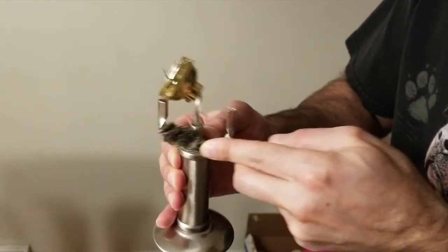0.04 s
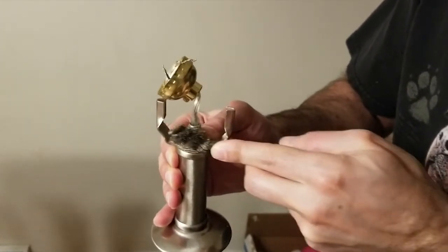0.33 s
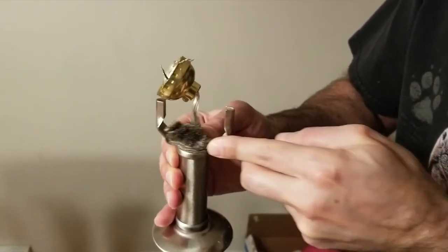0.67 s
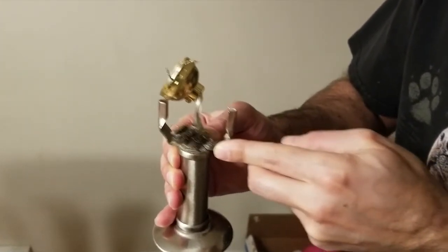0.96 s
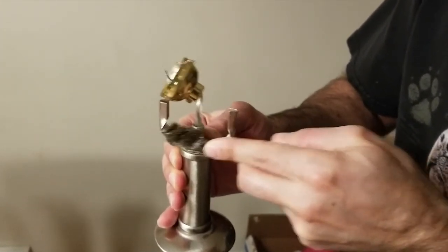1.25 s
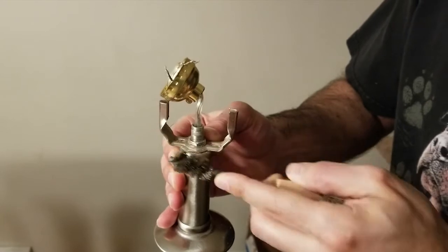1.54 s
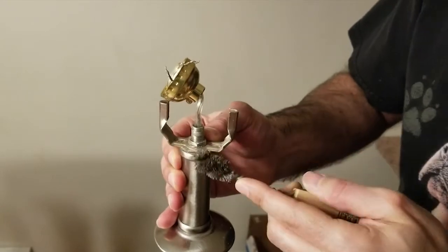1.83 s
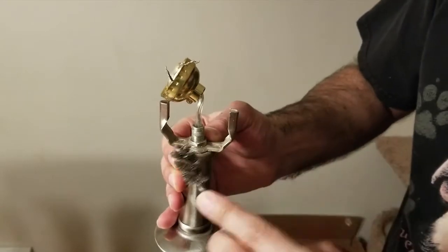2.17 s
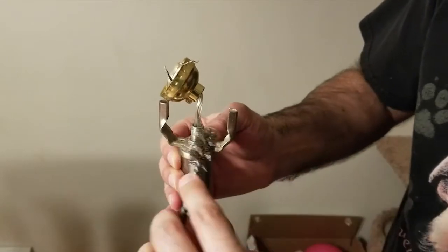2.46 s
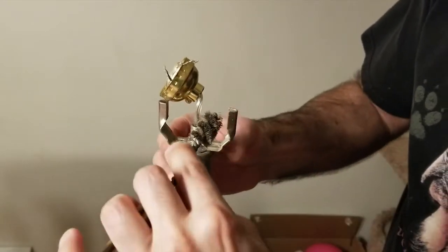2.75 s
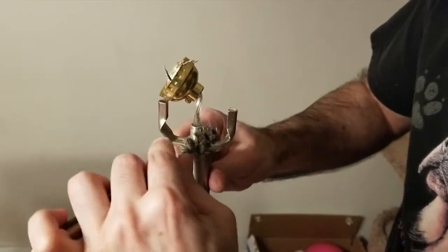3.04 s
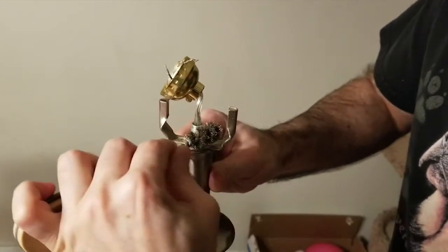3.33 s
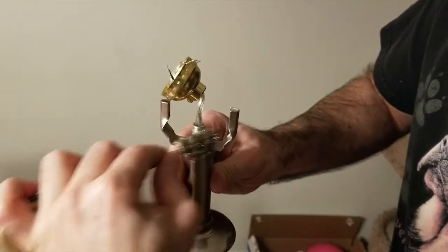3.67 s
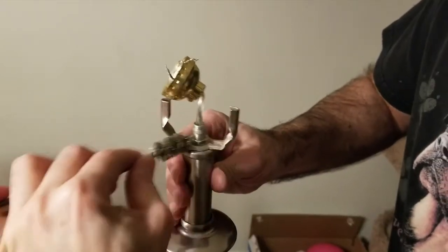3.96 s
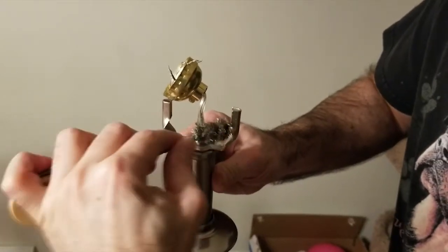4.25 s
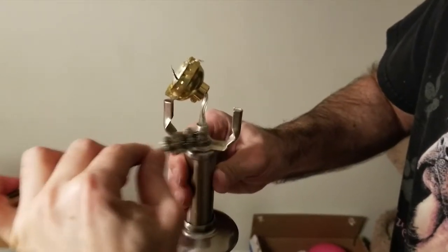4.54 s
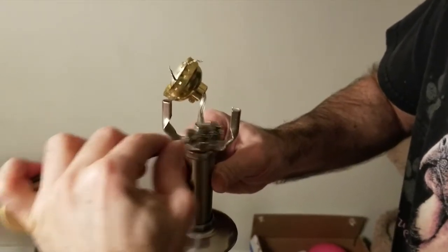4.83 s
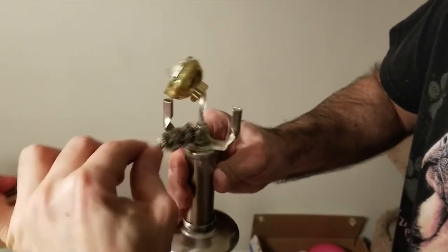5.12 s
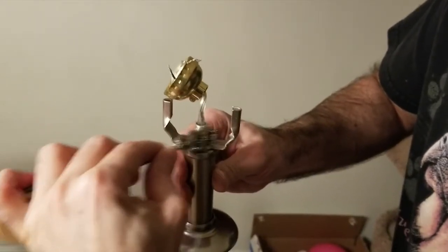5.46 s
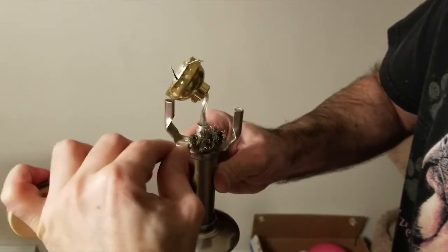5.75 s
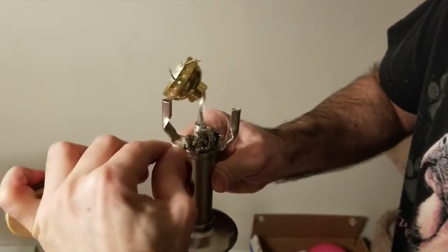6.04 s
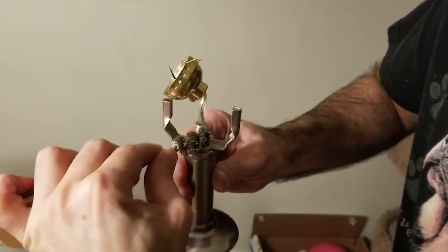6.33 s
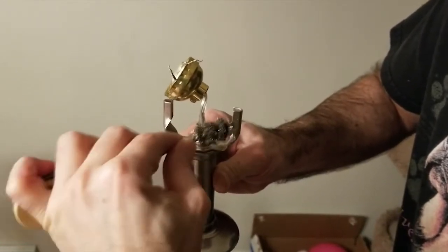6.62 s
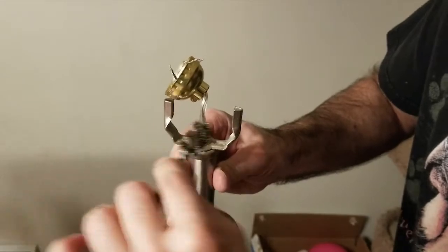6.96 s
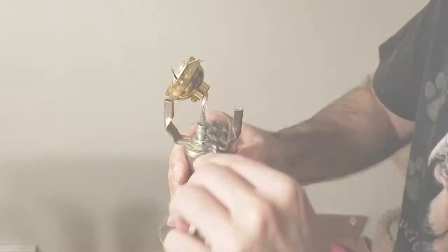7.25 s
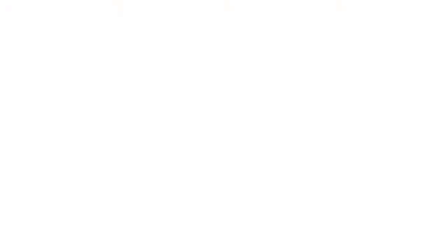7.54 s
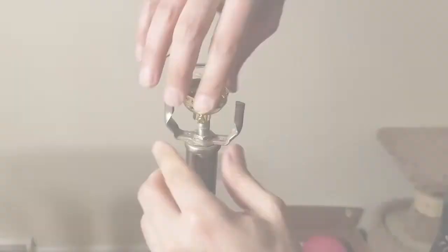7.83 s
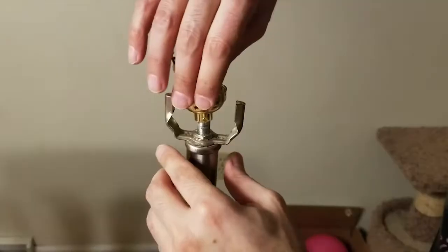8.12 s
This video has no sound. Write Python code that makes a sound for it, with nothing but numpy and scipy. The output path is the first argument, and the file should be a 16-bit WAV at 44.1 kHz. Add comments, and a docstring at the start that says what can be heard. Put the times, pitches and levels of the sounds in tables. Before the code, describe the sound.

Close to the microphone in a small room, a wire brush scrubs a metal lamp pipe in quick, scratchy strokes. It glides lightly with a faint hiss, then returns with longer, regular strokes, its shank sometimes knocking the pipe and making it ring. The scrubbing fades, and a brass cap is set on with soft clicks. Low handling bumps lie underneath.

```python
"""A small room, one microphone close to a hand-held lamp whose metal pipe is scrubbed with a wire brush.
Quick short strokes, a light pass down the side, then long strokes from the other side, where the shank
now and then knocks the pipe. Slipping wires shake themselves, the shank and the pipe; some catch and
spring off, and the pipe rings on. At the end a brass cap is set on with a few soft touches.
Underneath are low bumps of the holding hand, two dull rustles and a faint rumble."""
import sys
import numpy as np
from scipy import signal
from scipy.fft import rfft, irfft
from scipy.io import wavfile

SR = 44100
rng = np.random.default_rng(int(sys.argv[2]) if len(sys.argv) > 2 else 0)


def store_pcm(level_fs):
    """Save levels as 16-bit WAV."""
    pcm = np.round(np.clip(level_fs, -1, 1) * 32767).astype(np.int16)
    wavfile.write(sys.argv[1], SR, np.atleast_2d(pcm).T)


N = 369999
TIME = np.arange(N) / SR
TURNED = np.clip(TIME - 2, 0, 1)  # 0 in the tight first grip, 1 once the brush comes from the other side

# The brush on the pipe. Each row: start in seconds, end in seconds, strength in dB.
STROKES = [(0.029, 0.102, -28.5), (0.176, 0.27, -32.5), (0.306, 0.343, -38), (0.367, .41, -30.5),
           (0.491, 0.561, -31.5), (0.621, 0.654, -38), (0.688, 0.712, -29), (0.738, 0.809, -40.5),
           (0.804, 0.828, -27), (0.919, 0.946, -34), (1.037, 1.074, -39), (1.16, 1.214, -41.5),
           (1.23, 1.272, -26), (1.38, 1.411, -45.5), (3.193, 3.209, -41.5), (3.275, 3.324, -38.5),
           (3.428, 3.473, -27), (3.692, 3.732, -27), (3.886, 3.946, -25), (4.106, 4.139, -28),
           (4.268, 4.341, -27), (4.478, 4.529, -28.5), (4.669, 4.735, -28), (4.851, 4.914, -26),
           (5.041, 5.125, -28.5), (5.25, 5.322, -29.5), (5.44, 5.502, -29.5), (5.62, 5.656, -32),
           (5.682, 5.759, -40), (5.819, 5.877, -31.5), (5.914, 5.98, -33), (6.001, 6.019, -31.5),
           (6.166, 6.176, -39), (6.286, 6.363, -33), (6.492, 6.547, -27), (6.694, 6.763, -28),
           (7.232, 7.301, -47), (7.337, 7.396, -36.5), (7.434, 7.467, -34.5), (7.53, 7.565, -35.5)]
LIGHT_CONTACT = [(0, .82, -42.5), (.82, 1.45, -48), (1.45, 1.62, -65.5), (3.1, 3.4, -59), (5.33, 6.09, -44),
                 (6.77, 7.15, -64.5), (7.23, 7.58, -52)]  # the wires stay lightly on the metal
# The tips gliding down the pipe. Each row: time in seconds, level in dB.
GLIDE_LEVELS = [(2.1, -69), (2.25, -60), (2.44, -54), (2.65, -57), (2.86, -53), (2.93, -61.5), (3.15, -65)]
# Single events. Each row: start in seconds, strength in dB.
WIRE_SNAPS = [(.085, -13.5), (.177, -14.5), (.396, -18), (1.046, -20), (1.113, -30.5), (1.168, -25),
              (1.229, -19), (1.298, -25), (1.387, -25), (1.415, -29), (2.781, -41), (3.164, -38),
              (3.195, -28), (3.207, -25.5), (3.274, -26), (3.308, -21), (3.422, -23), (4.133, -18),
              (4.294, -17), (5.031, -24), (5.097, -10.5), (5.397, -26), (5.446, -18), (5.815, -26),
              (6.144, -27), (6.224, -33), (6.267, -27.5), (7.226, -37)]  # the loudest wires that catch and spring free
SHANK_KNOCKS = [(3.8614, -7.5), (4.079, -35.5), (4.243, -13), (4.448, -36), (4.6185, -7.5), (4.826, -35),
                (5.011, -32.5), (5.224, -43), (6.475, -40), (6.649, -8.5)]  # the shank lands ahead of a long stroke
SHANK_TWANGS = [(.074, -22), (.203, -25), (.251, -23.5), (.425, -29.5), (1.279, -25), (1.414, -26),
                (3.166, -35.5), (3.208, -29.5)]  # the twisted shank flexes
CAP_TOUCHES = [(7.847, -57), (8.084, -64), (8.118, -51), (8.128, -40)]
HAND_BUMPS = [(.058, -26), (0.258, -29), (.53, -24), (.825, -24.5), (1.251, -32), (1.625, -46),
              (2.659, -44), (2.858, -40.5), (4.28, -24.5)]
RUSTLES = [(0.0, -31), (7.576, -35.5)]

# The broad colour of each sound at the microphone. Each row: frequency in Hz, relative level in dB.
WIRE_SLOPE = [(1500, -20.5), (2800, -8.5), (4400, -6.5), (6000, -5.5), (7500, -5), (11500, 2), (13000, -13)]
SHANK_SLOPE = [(900, -38.5), (1700, -14.5), (2050, 0), (2600, -6), (3300, -25.5), (6000, -39)]
PIPE_SLOPE = [(50, -2), (130, 4.5), (300, 4.5), (500, 1), (620, -6), (850, -4), (1400, 2), (1700, -14.5),
              (3000, -32.5), (8000, -59.5)]
CRACK_SLOPE = [(500, -20), (1700, -25), (2000, 2.5), (2800, -8), (4400, -11), (6200, 2), (8300, 7.5),
               (9000, 0), (10300, 8), (13000, -15)]
GLIDE_SLOPE = [(120, -18), (200, -7), (418, -15), (723, -9), (1730, -16.5), (3380, -20.5), (6370, -7.5),
               (11200, -6.5), (12000, -19.5), (15600, -44), (22000, -120)]
CAP_SLOPE = [(150, -16), (600, -11), (1200, 4), (2200, -7.5), (3500, -2), (5000, -13), (8000, -4),
             (12000, -7)]
HAND_SLOPE = [(10, -9.0), (30, -5.5), (65, -1.5), (110, -6.5), (180, -14), (400, -41), (1500, -72)]
RUSTLE_SLOPE = [(100, -4.5), (400, 1), (540, 7.5), (1000, -0.5), (1800, -4), (2600, -18), (4200, -13.5),
                (5000, -21.5), (12000, -39)]
ROOM_TONE_SLOPE = [(15, -9.5), (35, -3), (62, 1.5), (120, -8), (220, -21), (450, -26.5), (1500, -40),
                   (5000, -42.5), (12000, -39.5)]
# Resonances of brush and lamp. Each row: centre in Hz, width in Hz, height above the slope in dB.
WIRE_PEAKS_FIRST = [(3800, 1400, 7.4), (7060, 530, 15.7), (8460, 330, 18.2), (10030, 520, 9.3)]
WIRE_PEAKS_TURNED = [(4255, 1100, -14.5), (5150, 130, 2.5), (7160, 270, 13.5), (8210, 240, 13.5),
                     (10190, 560, 9.5)]
SHANK_PEAKS = [(2295, 90, 12), (2417, 66, 11.1)]
PIPE_PEAKS_TIGHT = [(312.3, 34, 6.5), (452, 30, 8.5), (743.5, 28, 15.5), (1160, 28, 8.5), (1259, 47, 7),
                    (1382, 13, 16)]
PIPE_PEAKS_LOOSE = [(238, 13, 5), (300, 42, 5.8), (450.5, 21, 7.4), (738, 28, 20.7), (970, 12, 10),
                    (1185, 130, 9.9), (1268.8, 17, 18.3), (1379, 10, 14.3)]
CRACK_PEAKS = [(3640, 60, 3.2), (6440, 190, 7)]
THUD_PEAKS = [(231.3, 50, 7.9), (465, 43, 19.3), (583, 150, 13)]
HAND_PEAKS = [(64.5, 5.8, 4.9), (184.3, 4.3, 8)]
# The pipe ringing. Each row: frequency in Hz, relative level in dB, seconds to fall by 60 dB.
PIPE_MODES = [(660, -24.5, 0.99), (766, -19, 0.15), (991, -16.5, 0.082), (1163, -22, 0.73)]
CAPPED_MODES = [(730, -7.5, 0.31), (1162, -22, 0.73), (1290, -0.5, 0.14), (3400, -14, 0.16)]
# How freely the grip lets the pipe ring. Each row: time in seconds, gain in dB.
RING_FREEDOM = [(0, -12), (3.1, -9.5), (3.8, 4), (6.9, 4), (7.3, -8), (8.39, -8)]

GRAZE_S, GRAZE_DB = .025, -15.5  # the tips trail on after a stroke: this long, this much softer
REBOUND_S, REBOUND_DB = 0.0091, -10.5  # the shank bounces once
ROCK_DB, TREMBLE_DB, JOLT_DB = -7, -2, -13.5  # hand motion, relative to push, light contact and thud


def brushing(push):
    """Slipping wires shake three things: themselves, the shank and the pipe."""
    strokes = pressure(STROKES)
    graze = from_db(GRAZE_DB) * pressure(STROKES, overhang_s=GRAZE_S)
    touch = np.hypot(pressure(LIGHT_CONTACT), graze)
    tufts = unit_rms(flutter(per_s=190, depth_db=4))  # wires let go in clumps
    light_slips = touch * slips(per_s=1000, spread_db=5)
    snaps = bursts(*np.transpose(WIRE_SNAPS), decay_s=0.0023)
    snaps += wire_catches(touch + from_db(-2.5) * strokes)
    wires = wire_hiss(strokes, tufts, from_db(-9) * light_slips + snaps)
    return wires + shank_rasp(tufts) + pipe_rub(push * tufts, light_slips + snaps)


def wire_hiss(strokes, tufts, crackle):
    """The tips stick and slip; the wires bend and resonate differently from the other side."""
    tips = from_db(-0.55) * strokes * tufts * slips(per_s=8900, spread_db=6.5) + crackle
    tips += wire_pings(from_db(-7) * strokes * slips(per_s=1500, spread_db=3))
    tips = wire_reflection(tips)
    first_side = body(tips * (1 - TURNED), WIRE_SLOPE, WIRE_PEAKS_FIRST)
    other_side = body(tips * TURNED, WIRE_SLOPE, WIRE_PEAKS_TURNED)
    return from_db(0.52) * (first_side + other_side)


def wire_catches(rubbing, per_s=30, above_db=5, spread_db=2.5):
    """Single wires catch at random wherever the brush rubs, the louder the harder it presses."""
    at = np.flatnonzero((rng.random(N) < per_s / SR) & (rubbing > 0))
    levels_db = 20 * np.log10(rubbing[at]) + above_db + spread_db * rng.standard_normal(N)[at]
    return bursts(at / SR, levels_db, decay_s=0.0045)


def wire_pings(kicks, low_hz=2776, high_hz=12024, t60=0.02, count=24):
    """Each kick sets one of many wires swinging free, briefly, at a pitch of its own."""
    wire = rng.integers(0, count, N)
    pitches = np.geomspace(low_hz, high_hz, count) * np.exp(.02 * rng.standard_normal(count))
    ringing = sum(struck(kicks * (wire == k), hz, t60) for k, hz in enumerate(pitches))
    return np.std(kicks) * unit_rms(ringing)


def wire_reflection(x, delay_s=0.0008016, depth=0.45):
    """An echo along the wires; its delay wanders with the point of contact, so the colour shifts."""
    echo = np.interp(TIME - delay_s * flutter(per_s=10, depth_db=2), TIME, x)
    return (x + depth * echo) / np.sqrt(1 + depth ** 2)


def shank_rasp(tufts):
    """The twisted shank buzzes under the strokes, a little less once turned, and twangs as it flexes."""
    drive = stroke_drive(firm_db=-35.6, follows=0.92) * from_db(-2.5 * TURNED)
    rasp = drive * tufts * slips(per_s=1200, spread_db=2)
    twangs = from_db(1.9) * bursts(*np.transpose(SHANK_TWANGS), decay_s=0.0025)
    return body(rasp + twangs, SHANK_SLOPE, SHANK_PEAKS)


def pipe_rub(push, crackle):
    """Rubbing sounds the pipe's resonances; the tight first grip shifts and damps them."""
    rubbing = push * slips(per_s=4000, spread_db=3) + from_db(-11.5) * crackle
    tight = body(rubbing * (1 - TURNED), PIPE_SLOPE, PIPE_PEAKS_TIGHT)
    loose = body(rubbing * TURNED, PIPE_SLOPE, PIPE_PEAKS_LOOSE)
    return from_db(-1.83) * tight + from_db(-1.33) * loose


def shank_knocks():
    """The shank lands with a bright crack, a rebound and a thud in the pipe."""
    times, db = np.transpose(SHANK_KNOCKS)
    landings = bursts(times, db, decay_s=0.0038)
    rebounds = bursts(times + REBOUND_S, db + REBOUND_DB, decay_s=0.0068)
    thud = body(bursts(times, thud_level(db), decay_s=0.014), PIPE_SLOPE, PIPE_PEAKS_LOOSE + THUD_PEAKS)
    crack = body(landings + rebounds, CRACK_SLOPE, CRACK_PEAKS)
    return crack + from_db(-0.5) * thud


def pipe_ring(push):
    """Bending modes store the energy of knocks and rubbing and sing on, as far as the grip allows."""
    fed = (from_db(17.5) * push) ** 2 / SR
    for start, db in SHANK_KNOCKS:
        fed[int(start * SR)] += from_db(thud_level(db)) ** 2
    fed *= gain_curve(RING_FREEDOM) ** 2
    ring = np.zeros(N)
    for hz, db, t60 in PIPE_MODES:
        energy = signal.fftconvolve(fed, from_db(-60 * TIME[:SR] / t60) ** 2)[:N]
        swing = from_db(db) * np.sqrt(np.abs(energy)) * flutter(per_s=14, depth_db=0.9)
        ring += swing * np.sin(2 * np.pi * hz * TIME)
    return ring


def brush_glide():
    """Barely bent wires pass down the pipe with a fine, even hiss."""
    return gain_curve(GLIDE_LEVELS) * body(slips(per_s=9900, spread_db=3.5), GLIDE_SLOPE)


def brass_cap():
    """The cap meets the pipe with soft scrapes, a brief ring and two tiny ticks."""
    times, db = np.transpose(CAP_TOUCHES)
    scrapes = body(bursts(times, db, decay_s=0.012), CAP_SLOPE)
    kicks = np.zeros(N)
    kicks[(times * SR).astype(int)] = from_db(db)
    ring = sum(from_db(mode_db) * struck(kicks, hz, t60) for hz, mode_db, t60 in CAPPED_MODES)
    ticks = body(bursts(times=[7.799, 8.199], levels_db=[-44, -54], decay_s=0.0005), WIRE_SLOPE)
    return scrapes + ring + ticks


def handling(push):
    """Strokes rock the lamp in the hand and the tight grip trembles; shoves and landings bump it."""
    sway = from_db(ROCK_DB) * push + from_db(TREMBLE_DB) * pressure(LIGHT_CONTACT) * (1 - TURNED)
    bumps = bursts(*np.transpose(HAND_BUMPS), decay_s=0.037)
    times, db = np.transpose(SHANK_KNOCKS)
    jolts = bursts(times, thud_level(db) + JOLT_DB, decay_s=.06)
    return body(sway * rng.standard_normal(N) + bumps + jolts, HAND_SLOPE, HAND_PEAKS)


def rustles():
    """Soft, dull swishes that fade quickly."""
    return body(bursts(*np.transpose(RUSTLES), decay_s=0.054), RUSTLE_SLOPE)


def room(x, t60=0.25, wet_db=-10):
    """Diffuse reflections from near walls reach the microphone just behind the direct sound."""
    age = TIME[:SR // 2]
    tail = rng.standard_normal(len(age)) * from_db(-60 * age / t60) * (age > .004)
    return x + from_db(wet_db) * through(x, tail)


def room_tone(level_db=-55):
    """A faint, steady rumble with a trace of hiss."""
    return from_db(level_db) * body(rng.standard_normal(N), ROOM_TONE_SLOPE)


def pressure(spans, rise_s=0.0074, fall_s=0.0053, overhang_s=0):
    """Strength of the rubbing in each span: it builds as the wires bend and drops as they leave."""
    power = np.zeros(N)
    for start, end, db in spans:
        near = slice(max(int(start * SR) - SR // 8, 0), int(end * SR) + SR // 8)
        on = (1 + np.tanh((TIME[near] - start) / rise_s)) / 2
        off = (1 - np.tanh((TIME[near] - end - overhang_s) / fall_s)) / 2
        power[near] += from_db(db) ** 2 * on * off
    return np.sqrt(power)


def stroke_drive(firm_db, follows, firm_stroke_db=-28):
    """How hard strokes shake a part: firm_db in a firm one, changing by `follows` dB per dB."""
    return pressure([(start, end, firm_db + follows * (db - firm_stroke_db))
                     for start, end, db in STROKES])


def thud_level(knock_db, hard_knock_db=-8, hard_thud_db=-16.5):
    """Strength of a landing's thud in dB; softer landings lose the crack sooner than the thud."""
    return hard_thud_db + 0.5 * (knock_db - hard_knock_db)


def slips(per_s, spread_db):
    """Tiny stick-slip releases at random moments, of uneven size; rms 1."""
    sizes = from_db(spread_db * np.minimum(rng.exponential(1, N), 4))
    return unit_rms((rng.random(N) < per_s / SR) * sizes * rng.choice([-1, 1], N))


def bursts(times, levels_db, decay_s):
    """Contacts that start at once and chatter out."""
    envelope = np.zeros(N)
    for start, db in zip(times, levels_db):
        at = int(start * SR)
        age = TIME[:min(N - at, SR // 2)]
        envelope[at:at + len(age)] += from_db(db) * np.exp(-age / decay_s)
    return envelope * rng.standard_normal(N)


def struck(kicks, hz, t60):
    """A unit kick sets a sine of height 1 ringing."""
    decay, step = from_db(-60 / (t60 * SR)), 2 * np.pi * hz / SR
    return signal.lfilter([0, np.sin(step)], [1, -2 * decay * np.cos(step), decay ** 2], kicks + 1e-18)


def body(x, slope, peaks=(), size=16384):
    """A causal (minimum-phase) filter: a broad slope with resonances on top."""
    hz = np.maximum(np.fft.rfftfreq(size, 1 / SR), 1)
    slope_hz, slope_db = np.transpose(slope)
    gain = from_db(np.interp(np.log(hz), np.log(slope_hz), slope_db))
    lift = sum((from_db(db) ** 2 - 1) / (1 + (2 * (hz - centre) / width) ** 2)
               for centre, width, db in peaks)
    cepstrum = irfft(np.log(gain * np.sqrt(np.maximum(1 + lift, .1))))
    response = irfft(np.exp(rfft(2 * cepstrum[:size // 2], size)))
    return through(x, response)


def through(x, response):
    """Pass a sound through an impulse response scaled to unit energy."""
    return signal.fftconvolve(x, response / np.linalg.norm(response))[:N]


def flutter(per_s, depth_db):
    """A gain that wavers at random."""
    knots = np.arange(0, TIME[-1] + 1, 1 / per_s)
    return from_db(depth_db * np.interp(TIME, knots, rng.standard_normal(N)[:len(knots)]))


def gain_curve(rows):
    """Gain along rows of time in seconds and level in dB; silent outside them."""
    times, db = np.transpose(rows)
    return from_db(np.interp(TIME, times, db, left=-np.inf, right=-np.inf))


def from_db(db):
    return 10 ** (np.asarray(db) / 20)


def unit_rms(x):
    return x / np.sqrt(np.mean(x ** 2) + 1e-20)


def scene():
    """Brush and lamp close up, the room behind them, in mono."""
    push = stroke_drive(firm_db=-31.5, follows=0.99)  # the strokes' force on the pipe
    lamp = brushing(push) + shank_knocks() + brush_glide() + brass_cap() + handling(push)
    background = room_tone()
    return (room(lamp + rustles()) + pipe_ring(push) + background)[None]


def record(dry, ceiling=.8, cutoff_hz=12150):
    """The hardest peaks are softly rounded; the recorder cuts the top steeply."""
    rounded = ceiling * np.tanh(dry / ceiling)
    return signal.sosfilt(signal.ellip(10, .3, 75, cutoff_hz, fs=SR, output="sos"), rounded)


dry = scene()
out = record(dry)
store_pcm(out)
```